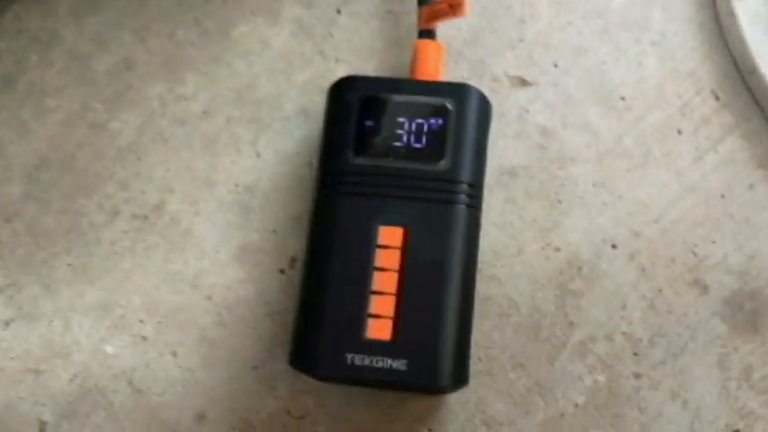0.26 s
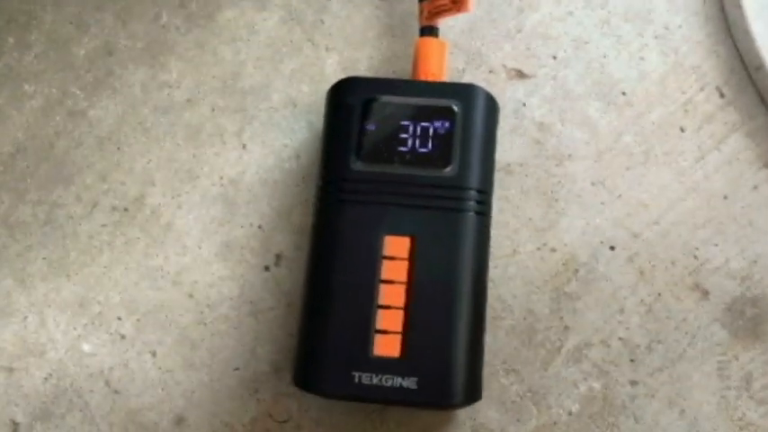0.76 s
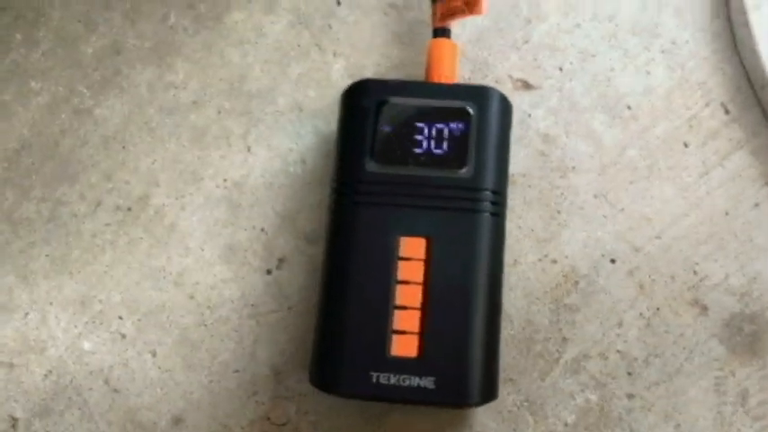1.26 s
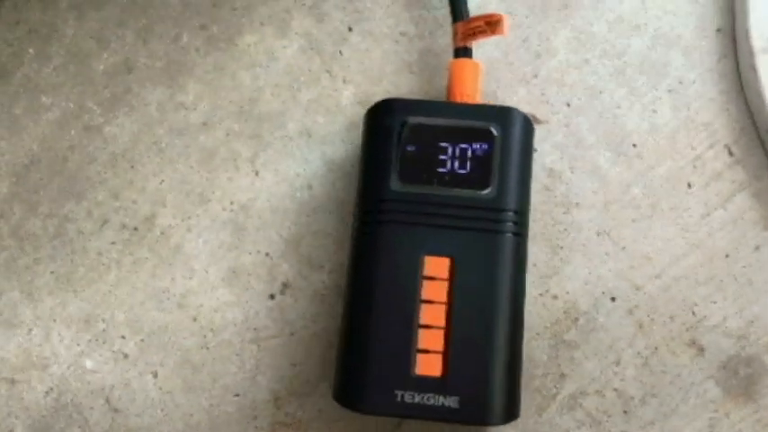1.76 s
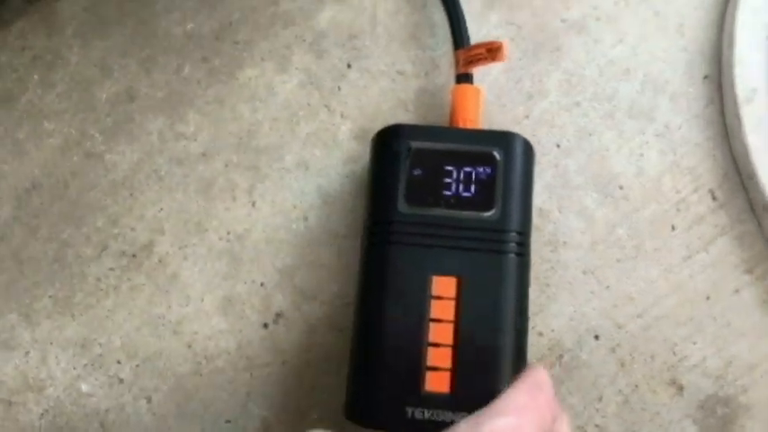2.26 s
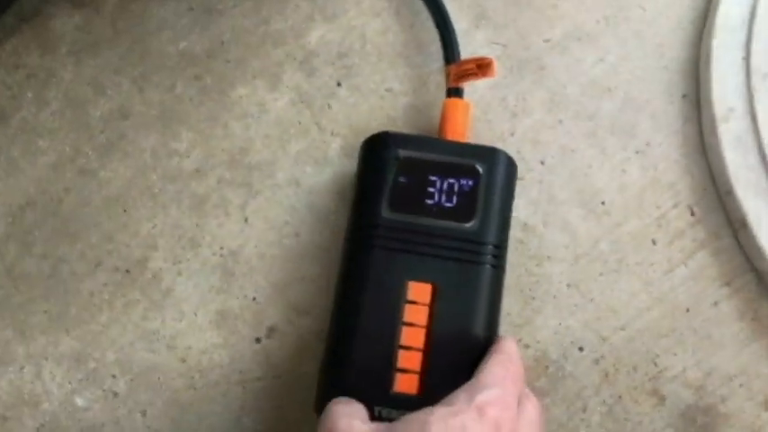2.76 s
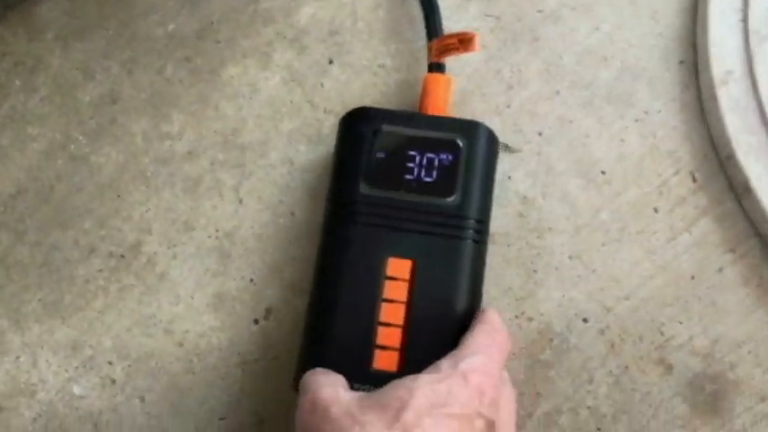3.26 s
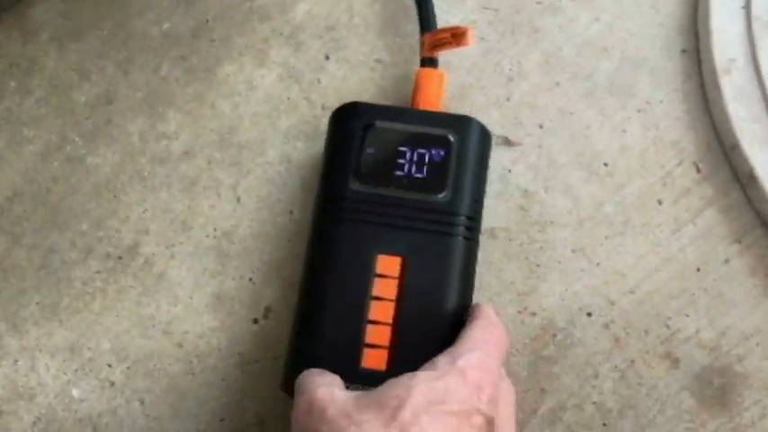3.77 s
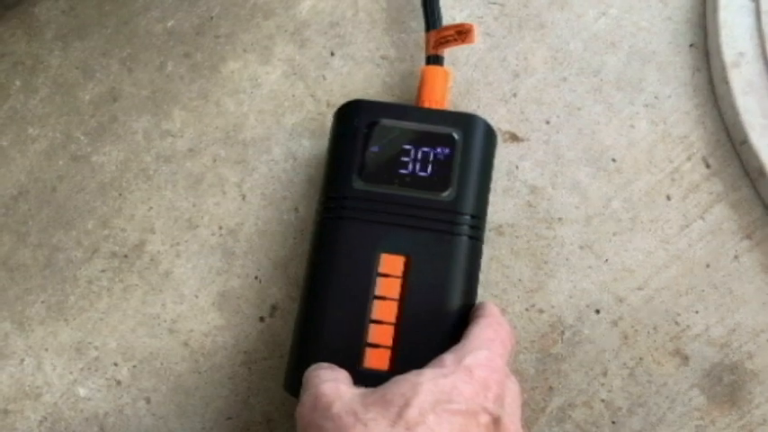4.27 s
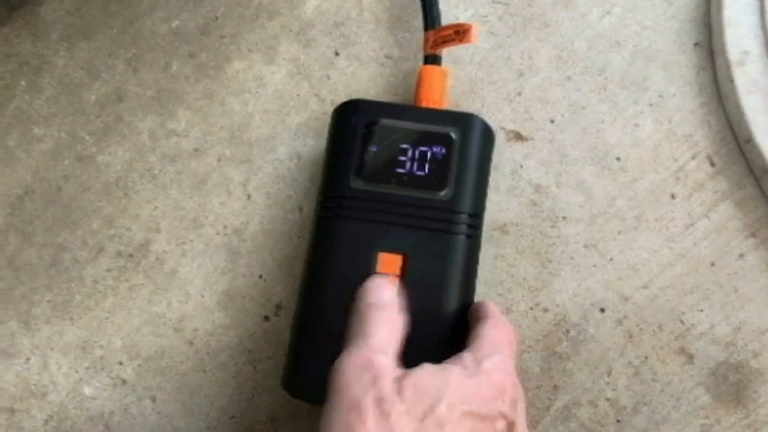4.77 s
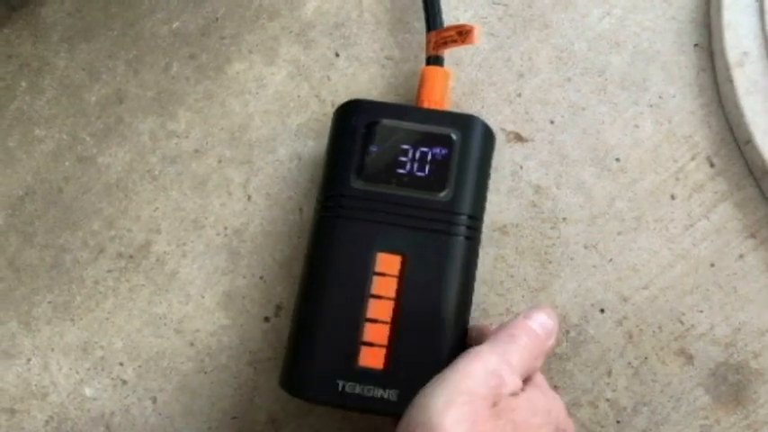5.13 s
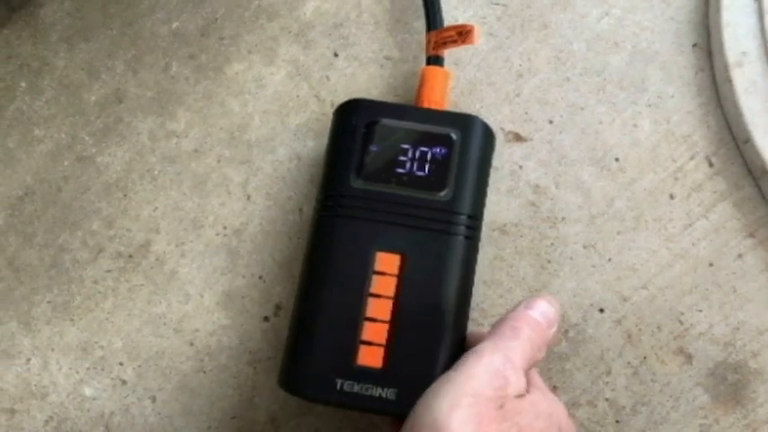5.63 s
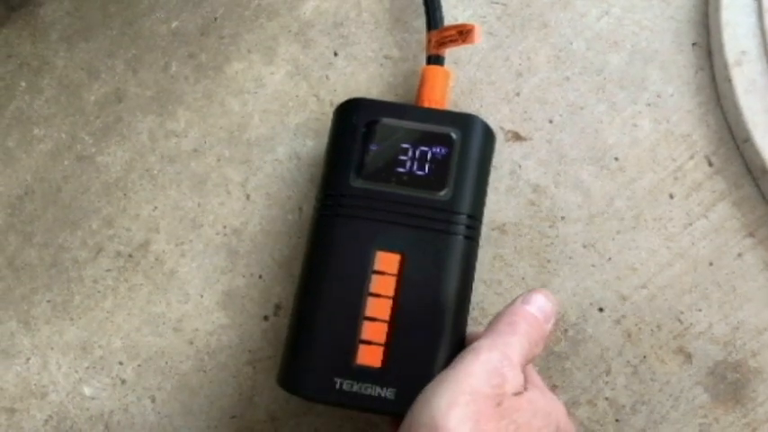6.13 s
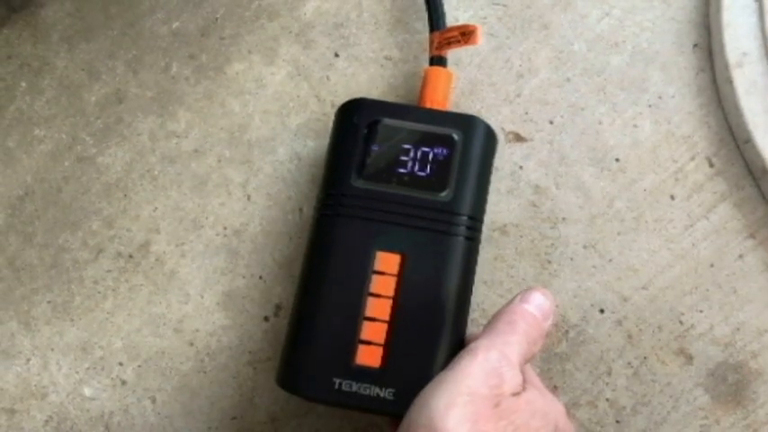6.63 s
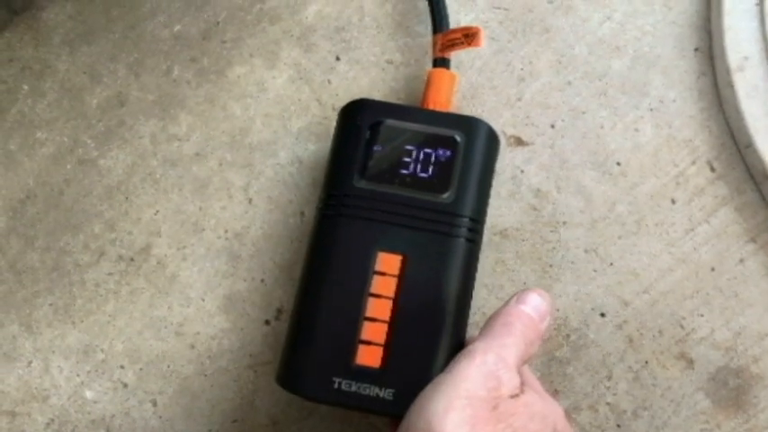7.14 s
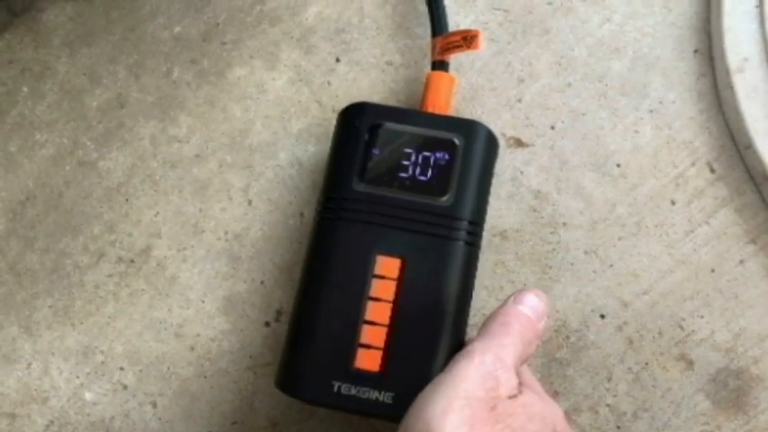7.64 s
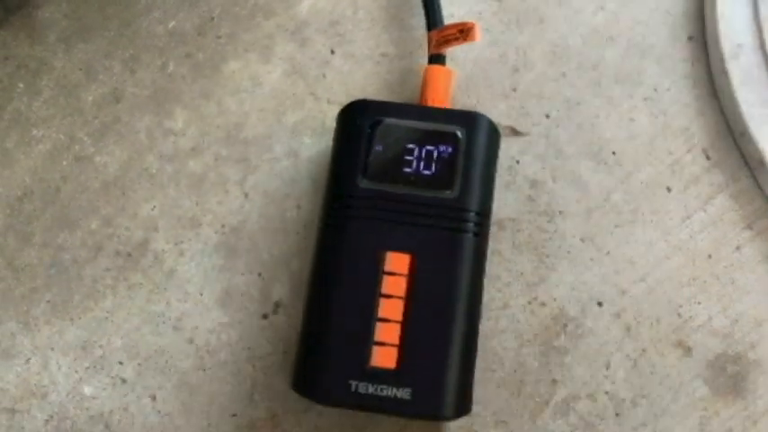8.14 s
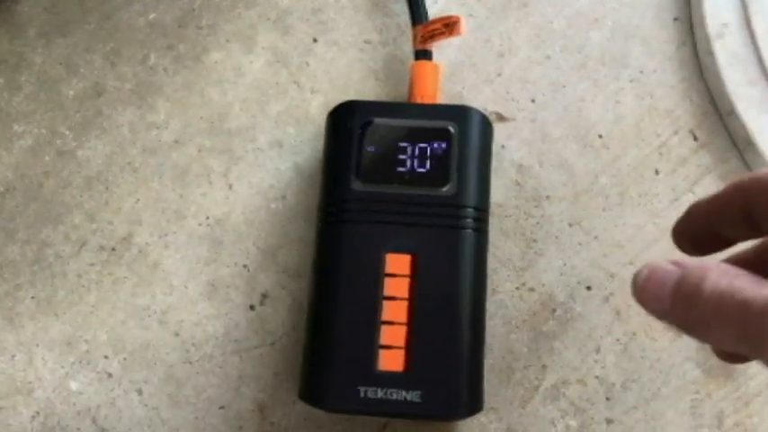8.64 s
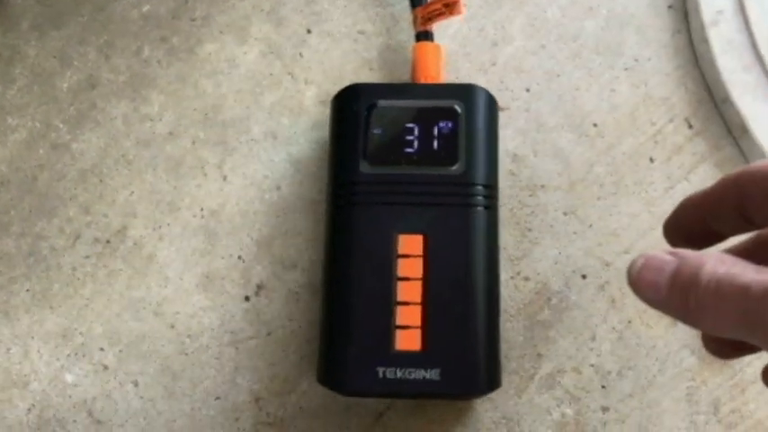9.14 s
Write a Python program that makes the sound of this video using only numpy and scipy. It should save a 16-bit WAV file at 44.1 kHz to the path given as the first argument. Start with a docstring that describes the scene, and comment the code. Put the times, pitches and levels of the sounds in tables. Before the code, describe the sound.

Loud, steady motorized chatter of a small tyre inflator on a garage floor, about fifty strokes a second, raspy, whistling and slightly overloaded.

```python
"""A pocket-size electric piston compressor pumps up a car tyre on a concrete garage floor, heard close by.
Every crank turn gives a hollow thump (summed harmonics), loose knocks (noise through resonances),
a chirp of the intake flap and a thin outlet whistle (fluttering tone pulses). The gears drone and rattle
in the plastic casing, and air squeaks and hisses: harmonics, and friction noise shaped by the crank cycle.
The hand-held microphone wanders, favouring now one part, now another; the loudest peaks overload it."""
import sys
import numpy as np
from scipy import signal
from scipy.fft import rfft, irfft, next_fast_len
from scipy.io import wavfile
from scipy.ndimage import map_coordinates

SR = 44100
rng = np.random.default_rng(int(sys.argv[2]) if len(sys.argv) > 2 else 0)


def generate_wav(signal):
    """Clip the signal to [-1, 1] and save it as 16-bit WAV at the path in sys.argv[1]."""
    frames = np.transpose(np.atleast_2d(signal))
    scaled = np.clip(frames, -1, 1) * 32767
    pcm = np.round(scaled).astype(np.int16)
    wavfile.write(sys.argv[1], SR, pcm)


N = 414540

# Crank speed, slower overall as the tyre pressure rises: (time [s], speed [turns/s])
CRANK_SPEED = [(0, 50.522), (2.7, 50.437), (4, 50.495), (6.6, 50.246), (9.4, 50.188)]
# Effort through one crank turn, relative levels: (position [turns], gear load [dB], jolt to casing [dB],
# valve flow [dB], air leak [dB])
CRANK_CYCLE = [(.02, 5.5, 15, -5.5, 1), (.14, 13, 0.5, 3.5, 1), (.28, 14.5, 14.5, -6, 5),
               (.42, 11.5, -5, -19.5, -1), (.56, 0.5, 2, -17, 1), (.68, 7.5, 0, -14, 5.5),
               (.81, 12.5, -12, -1.5, 1), (.92, 14.5, -16, -2.5, 4.5)]

# Harmonics of the crank rate, relative levels: (multiple of the crank rate [1], level [dB])
# Hum of the shaking body
BODY_HARMONICS = [(1, -4), (2, 2.5), (3, -15.5), (4, -6), (5, -9.5), (6, -25), (7, -20), (8, -30),
                  (9, -5.5), (10, -9.5), (11, -55)]
# Thump of the compression stroke
THUMP_HARMONICS = [(12, -13.5), (13, -0.85), (14, 1), (15, 4), (16, -2), (17, 0.5), (18, -0.9), (19, 2.5)]
# Outline of the motor and gear drone; every whole multiple between the points sounds
DRONE_OUTLINE = [(20, -3), (21, 3), (22, -8.5), (23, -8.5), (26, -3.5), (30, -14), (33, -7.5), (35, -14),
                 (39, -6.5), (42, -16.5), (46, -6.5), (51, -21.5), (57, -11), (62, -17.5)]

# Resonances, relative levels: (frequency [Hz], bandwidth [Hz], level [dB])
# Loosely fitting piston
PISTON_MODES = [(789, 235, 0), (934, 250, 1), (1146, 133, -7.5)]
# Plastic casing
CASING_MODES = [(3350, 240, -1.5), (3517, 180, -3)]
# Gearbox
GEARBOX_MODES = [(3646, 234, -5.5), (3990, 206, -4.5), (4240, 84, 3), (4363, 160, -3.5), (4725, 280, -7)]
# Squeak of the outlet valve
SQUEAK_MODES = [(6530, 290, -7), (6820, 370, 2.5), (7610, 230, 0)]

# Spectral weighting of noise, relative levels: (frequency [Hz], level [dB])
# Rattle of the gears
RATTLE_SPECTRUM = [(1000, -19), (1200, 5), (1650, 3.5), (1780, -0.5), (1950, 2.5), (2150, -1), (2500, 1),
                   (2850, -2.5), (3100, -6), (4600, -9.5), (5100, -17), (6300, -5.5), (8500, -38)]
# Hiss of air leaking past the piston
HISS_SPECTRUM = [(2500, -2), (5000, -0.5), (6500, 3), (7500, 0.5), (7900, 3), (8250, 2.5), (8800, 0),
                 (9900, 0), (10200, 3.5), (10600, -5.5), (12100, -1), (12800, 0), (13800, -5.5),
                 (15700, -4.5)]
# Steady low background
RUMBLE_SPECTRUM = [(15, -10), (50, 5), (105, 12), (150, -3), (400, -21), (600, 8), (1000, 3), (2000, -37)]

# Note of the intake flap, shifting with its flexing: (time [s], frequency [Hz])
FLAP_NOTE = [(0, 2345), (1.2, 2290), (3, 2320), (7.8, 2400), (8.6, 2270), (9.4, 2280)]
# Intake flap as heard from the moving microphone: (time [s], level [dB])
FLAP_CURVE = [(0, -20.5), (.4, -18.5), (1.2, -18), (2.5, -23.5), (4.6, -22.5), (5.2, -25.5), (7.7, -26),
              (8.7, -21.5), (9.4, -20)]
# Outlet whistle: (time [s], level [dB])
WHISTLE_CURVE = [(0, -23), (.45, -26.5), (1.2, -21.5), (1.5, -28.5), (2.8, -34), (4.5, -25.5), (6.2, -22.5),
                 (8.2, -26.5), (9.1, -31)]
# Spots where the microphone lingers and the balance of parts changes:
# (start [s], end [s], squeak change [dB], casing change [dB], gearbox change [dB])
MICROPHONE_SPOTS = [(.2, 1.354, -5, 0, 0.5), (1.38, 2.42, 3, 3.3, -1.5), (2.4, 3.3, -2, 1, 1.4),
                    (7.95, 8.602, 6.5, 2.5, -1.5)]

DRONE_DB, RATTLE_DB, HISS_DB = -17.5, -21, -17
CASING_DB, GEARBOX_DB, SQUEAK_DB = -21.5, -18, -24   # before the microphone shifts the balance
CASING_AGAINST_FLAP = 0.62   # dB lost by the casing per dB gained by the flap, which faces another way
WAVER_DB, WAVER_PER_S = 0.07, 2.44   # rms and rate of the slow chance in a level
SHIFT_S = 0.3   # time the microphone takes to reach or leave a spot
CUTOFF_HZ = 15850


def from_db(db):
    """Logarithmic level: 20 dB is a tenfold amplitude ratio."""
    return 10 ** (np.asarray(db) / 20)


def rms_one(x):
    """Power normalisation: scale to a root mean square of one."""
    return x / np.sqrt(np.mean(x ** 2) + 1e-20)


def in_time(rows):
    """Linear interpolation: each column of a time curve at every sample."""
    times, *columns = np.transpose(rows)
    t = np.arange(N) / SR
    return [np.interp(t, times, column) for column in columns]


def drift(rate):
    """Band-limited chance: a smooth curve through about `rate` random values a second; rms 1."""
    knots = rng.standard_normal(4096)
    position = np.arange(N) / SR * rate
    return rms_one(map_coordinates(knots, [position], order=2, mode="grid-wrap"))


def wavering(db):
    """Slow amplitude modulation: a gain that wanders about a level."""
    return from_db(db + WAVER_DB * drift(WAVER_PER_S))


def coloured(x, spectrum):
    """Linear filtering: weight the Fourier spectrum of x by a smooth curve; rms 1."""
    hz, db = np.transpose(spectrum)
    size = next_fast_len(N)
    bins = np.maximum(np.fft.rfftfreq(size, 1 / SR), 1)
    gain = from_db(np.interp(np.log(bins), np.log(hz), db))
    return rms_one(irfft(rfft(x, size) * gain, size)[:N])


def resonate(x, modes):
    """Modal superposition: x drives parallel damped resonators of alternating sign; rms 1."""
    out = 0
    for k, (hz, width, db) in enumerate(modes):
        r = np.exp(-np.pi * width / SR)   # wider resonances decay faster
        poles = [1, -2 * r * np.cos(2 * np.pi * hz / SR), r * r]
        unit_peak = (1 - r * r) / 2
        mode = signal.lfilter([1, 0, -1], poles, x)
        out = out + (-1) ** k * from_db(db) * unit_peak * mode
    return rms_one(out)


def since(turn, mark):
    """Periodic phase: signed distance, in turns, from the nearest pass of a mark on the crank."""
    return (turn - mark + .5) % 1 - .5


def friction(turn, repeat, grain_db):
    """Rough contact: the same flaws come round on every turn, mixed with fresh chance."""
    texture, bumps = rng.standard_normal(size=(2, 876))
    place = turn % 1 * len(texture)
    flaws = map_coordinates(texture, [place], order=3, mode="grid-wrap")
    tooth = (place // 12).astype(int)   # 73 steps of level in each turn
    teeth = from_db(grain_db * np.clip(bumps, -1.3, 1.3)[tooth])
    repeat = np.clip(repeat, 0, 1)   # share of the power that recurs
    fresh = rng.standard_normal(N)
    return teeth * (np.sqrt(repeat) * flaws + np.sqrt(1 - repeat) * fresh)


def stroke(turn, harmonics, mark, spread):
    """Fourier series with dispersion: partials delay by `spread` turns per step above the strongest."""
    centre = round(max(harmonics, key=lambda row: row[1])[0])
    out = 0
    for multiple, db in harmonics:
        k = round(multiple)
        dispersion = np.pi * spread * (k - centre) ** 2
        out = out + from_db(db) * np.cos(2 * np.pi * k * (turn - mark) - dispersion)
    return rms_one(out)


def slap(turn, mark, length, between_db):
    """Impact excitation: the loose piston knocks as it turns round, never twice alike, and scrapes between."""
    force = np.exp(-(since(turn, mark) / length) ** 2) + from_db(between_db)
    return resonate(force * rng.standard_normal(N), PISTON_MODES)


def flap(turn, speed, mark, length, pitch_hz, fall_hz, rough):
    """Flow-excited flutter: a tone of a few milliseconds each turn, its pitch sinking as the flow eases."""
    age = since(turn, mark)
    # the pitch falls by fall_hz over each `length` of crank turn
    cycles = (pitch_hz - fall_hz * age / length / 2) * age / speed
    flutter = np.cos(2 * np.pi * cycles + rough * drift(170))
    envelope = np.exp(-np.abs(age / length) ** 3)
    unsteadiness = 1 + min(rough, .3) * drift(260)
    return rms_one(envelope * flutter * unsteadiness)


def piston(turn, speed, flap_db):
    """Periodic excitation: each turn shakes the body, thumps, knocks and makes the intake flap chirp."""
    flap_hz, = in_time(FLAP_NOTE)
    shake = from_db(-19.5) * stroke(turn, BODY_HARMONICS, mark=0.617, spread=.25)
    thump = from_db(-10.0) * stroke(turn, THUMP_HARMONICS, mark=.232, spread=0.018)
    knock = from_db(-21.5) * slap(turn, mark=0.58, length=0.25, between_db=-1.0)
    chirp = flap(turn, speed, mark=.86, length=0.13, pitch_hz=flap_hz, fall_hz=108, rough=0.087)
    return shake + thump + knock + from_db(flap_db) * chirp


def every_multiple(outline):
    """Harmonic series: fill in all whole multiples between the points of an outline."""
    multiples, db = np.transpose(outline)
    first, last = round(multiples[0]), round(multiples[-1])
    return [(k, np.interp(k, multiples.round(), db)) for k in range(first, last + 1)]


def gear_train(turn, load, jolt, casing_db, gearbox_db):
    """Forced vibration: gears drone and rattle under load and set the plastic ringing."""
    drone = from_db(DRONE_DB) * stroke(turn, every_multiple(DRONE_OUTLINE), mark=.216, spread=-.188)
    rattling = load * friction(turn, repeat=0.26, grain_db=4.5)
    rattle = wavering(RATTLE_DB) * coloured(rattling, RATTLE_SPECTRUM)
    shaking = jolt * friction(turn, repeat=0.8, grain_db=4)
    casing = wavering(casing_db) * resonate(shaking, CASING_MODES)
    meshing = load * friction(turn, repeat=0.71, grain_db=6)
    gearbox = wavering(gearbox_db) * resonate(meshing, GEARBOX_MODES)
    return drone + rattle + casing + gearbox


def air(turn, speed, flow, leak, squeak_db):
    """Flow noise: air whistles and squeaks through the outlet valve and leaks past the piston."""
    whistle_db, = in_time(WHISTLE_CURVE)
    tone = flap(turn, speed, mark=.8, length=0.2, pitch_hz=7120, fall_hz=40, rough=0.48)
    whistle = from_db(whistle_db) * tone
    valve_noise = flow * friction(turn, repeat=0.67, grain_db=7.0)
    squeak = wavering(squeak_db) * resonate(valve_noise, SQUEAK_MODES)
    leak_noise = leak * friction(turn, repeat=0.41, grain_db=2.0)
    hiss = from_db(HISS_DB + .5 * drift(50)) * coloured(leak_noise, HISS_SPECTRUM)
    return whistle + squeak + hiss


def background_rumble():
    """Stationary noise: a steady, mostly low rumble independent of the crank."""
    return from_db(-32.5) * coloured(rng.standard_normal(N), RUMBLE_SPECTRUM)


def microphone_spots():
    """Directional balance: dB changes of squeak, casing and gearbox fade in, hold and fade out."""
    t = np.arange(N) / SR
    total = 0
    for start, end, *changes in MICROPHONE_SPOTS:
        presence = np.clip(np.minimum(t - start, end - t) / SHIFT_S + .5, 0, 1)
        total = total + np.outer(changes, presence)
    return total


def scene():
    """Common periodicity: all machine parts follow one crank; their balance shifts with the microphone."""
    speed, = in_time(CRANK_SPEED)
    turn = .374 + np.cumsum(speed) / SR
    turn = turn + 0.00074 * drift(9) + 0.00043 * drift(70)   # the motor runs a little unevenly
    share, *efforts = np.transpose(CRANK_CYCLE)
    load, jolt, flow, leak = [from_db(np.interp(turn, share, db, period=1)) for db in efforts]

    flap_db, = in_time(FLAP_CURVE)
    squeak_change, casing_change, gearbox_change = microphone_spots()
    turned_away = CASING_AGAINST_FLAP * (flap_db - flap_db.mean())
    casing_db = CASING_DB + casing_change - turned_away

    machine = piston(turn, speed, flap_db)
    machine = machine + gear_train(turn, load, jolt, casing_db, GEARBOX_DB + gearbox_change)
    machine = machine + air(turn, speed, flow, leak, SQUEAK_DB + squeak_change)
    return (machine + background_rumble())[None]


def record(dry, ceiling=0.81, hardness=4.8):
    """Saturation and band limiting: the microphone rounds off the peaks; the top is cut."""
    rounded = dry / (1 + np.abs(dry / ceiling) ** hardness) ** (1 / hardness)
    lowpass = signal.firwin(801, CUTOFF_HZ, fs=SR, window="blackman")
    return signal.fftconvolve(rounded, lowpass[None], mode="same")


dry = scene()
out = record(dry)
generate_wav(out)
```